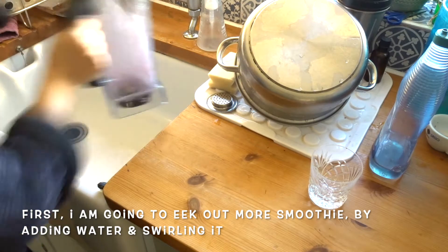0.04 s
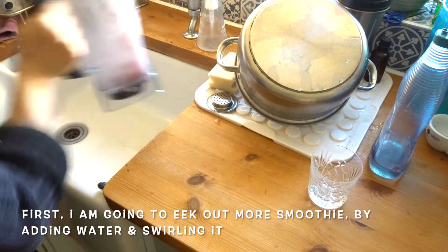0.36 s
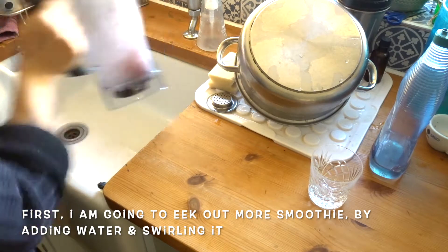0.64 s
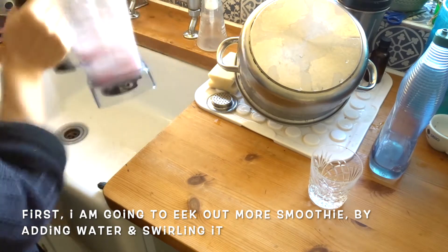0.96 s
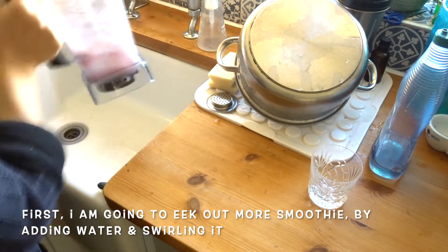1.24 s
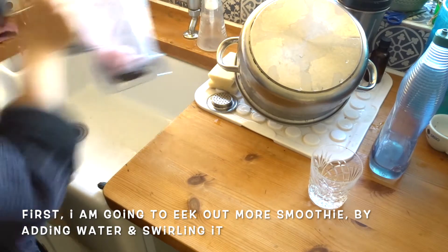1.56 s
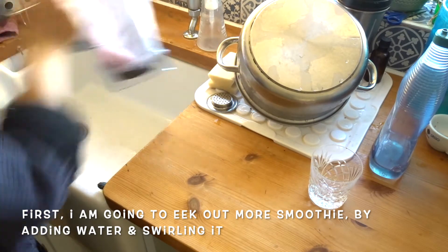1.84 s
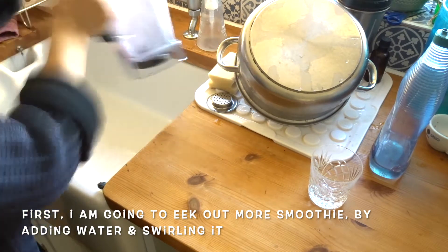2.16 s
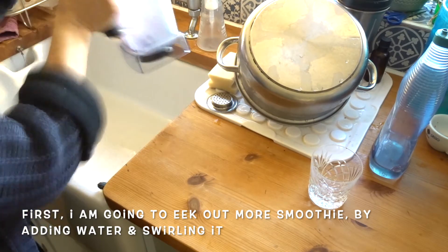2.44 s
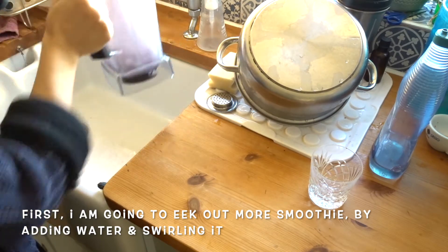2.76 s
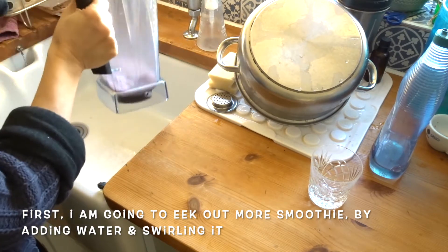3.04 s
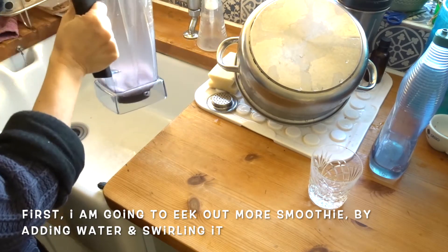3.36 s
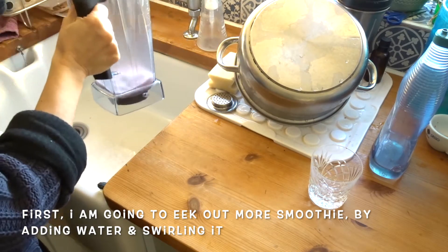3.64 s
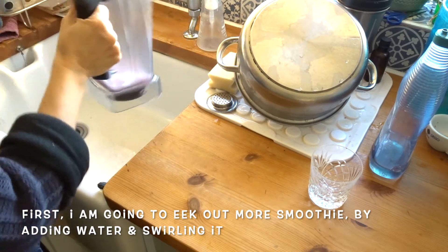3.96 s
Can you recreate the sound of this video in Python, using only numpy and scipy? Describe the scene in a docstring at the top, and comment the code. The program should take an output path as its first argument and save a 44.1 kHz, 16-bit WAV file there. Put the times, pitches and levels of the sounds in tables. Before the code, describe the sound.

Water sloshes around a plastic blender jug swirled by hand, nearly four splashes a second, each with hollow gurgles and a softer backwash. The swirling eases at about 2.7 seconds and settles by 3. From about 3.1 to 3.3 seconds the jug is set down in the sink with a clunk, rocking briefly. A faint appliance hum runs throughout in the kitchen and remains to the end.

```python
"""Water is swirled by hand in a plastic blender jug over a kitchen sink, nearly four turns a second.
Each turn throws a splash up the wall and a softer backwash; its bubbles ring the air in the jug.
The water calms and the jug is set down with a clunk, while an appliance hums in the room."""
import sys
import numpy as np
from scipy import signal
from scipy.fft import rfft, irfft
from scipy.io import wavfile

SR = 44100
rng = np.random.default_rng(int(sys.argv[2]) if len(sys.argv) > 2 else 0)


def master_out(mix):
    """Clip the mix to full scale and print it as 16-bit PCM to the path in sys.argv[1]."""
    frames = np.transpose(np.atleast_2d(mix))
    ceiling = np.clip(frames, -1, 1)
    pcm = np.round(ceiling * 32767).astype(np.int16)
    wavfile.write(sys.argv[1], SR, pcm)


N = 176400

# water thrown against the wall (start s, hold s, gurgle dB, spray dB)
SPLASHES = [(-.02, 0.029, 2, -0.5), (0.223, 0.029, 2, 5.5), (0.475, 0.083, 0.5, -0.5), (0.76, 0.054, 3, 0), (1.036, 0.094, -0.5, 0.5), (1.325, 0.061, -5.5, 0.5),
            (1.596, 0.074, -2, 0), (1.859, 0.085, -2, 1), (2.135, 0.074, -1, 2.5), (2.403, .095, -8, 1), (2.673, 0.028, -4.5, -3), (2.783, .025, -14, -9)]
RISE_S, FALL_S = 0.024, 0.025
# water running back round the jug (middle s, half length s, gurgle dB, spray dB)
BACKWASHES = [(0.101, 0.062, -6, -6), (0.341, 0.08, -4.5, -4), (0.663, 0.058, -6, -5), (0.904, 0.082, -6, -4.5), (1.227, 0.047, -5.5, -4), (1.477, 0.095, -8, -4),
              (1.753, 0.058, -4.5, -2), (2.046, 0.056, -3.5, -4), (2.299, 0.048, -2, -2), (2.583, 0.069, -7, -5.5), (2.766, 0.022, -11, -9.5), (2.882, 0.065, -21, -22)]
# bubble sounds (Hz, dB per Hz)
GURGLE = [(60, -42.5), (110, -21), (150, -14.5), (250, -22), (400, -14.5), (700, -8), (900, -6.5), (1080, -8), (1250, -1), (2200, 1.5), (2800, -13), (4000, -9), (8000, -46)]
SPRAY = [(300, -45), (1200, -4), (2300, 1), (3300, 1), (4800, 0), (6200, -5.5), (8000, -10), (10000, -13.5), (11200, -16)]
GURGLE_DB, GURGLE_PER_S, GURGLE_SPREAD_DB, GURGLE_CYCLES = -34, 1500, 3, 3
SPRAY_DB, SPRAY_PER_S, SPRAY_SPREAD_DB, SPRAY_CYCLES = -29.5, 6000, 0.5, 2.35
# air resonances of the jug (Hz, width Hz, gain dB)
JUG_AIR = [(558.7, 16, 16), (670, 88, 4.5), (1156, 39, 4), (1262, 25, 2), (1366, 40, -7), (1567, 70, 5), (1630, 40, -24), (2288, 94, -7), (2363, 46, -7), (3330, 33, -12.5), (4130, 65, -19)]
AIR_WANDER, TURNS_HZ = 0.029, 3.4
# large single bubbles (s, pitch Hz, peak dB, t60 s)
GULPS = [(.003, 1245, -30.5, 0.34), (0.111, 4570, -18.5, 0.014), (0.141, 4070, -19.5, 0.016), (.2105, 2550, -23, 0.027), (.211, 564, -32.5, 0.088), (.245, 1685, -20, 0.091), (.249, 2400, -16.5, 0.038), (0.486, 1380, -17.5, 0.034), (.506, 3840, -17.5, 0.055),
         (.777, 1408, -12.5, 0.035), (0.7848, 1755, -11.5, 0.018), (.791, 2406, -16.5, 0.087), (0.794, 1260, -16, 0.088), (0.983, 2357, -28, .07), (1.06, 1137, -21, 0.075), (1.138, 2310, -19.5, .08),
         (1.33, 1710, -25, 0.057), (1.353, 1740, -18.5, 0.047), (1.471, 2260, -23, 0.094), (1.877, 2390, -17, 0.034), (1.897, 4280, -9.5, 0.013), (1.935, 1537, -16, 0.05),
         (2.188, 2400, -21, .04), (2.296, 3890, -15, 0.018), (2.425, 1638, -16, 0.05), (2.507, 2260, -23, 0.055), (2.647, 1610, -26.5, 0.047), (2.693, 2250, -23.5, 0.071), (2.728, 2910, -24.5, 0.03), (2.75, 3870, -27.5, .03), (2.759, 2224, -27, 0.043),
         (2.771, 1283, -30, 0.16), (2.8, 2250, -33, 0.1), (2.821, 1304, -36, 0.15), (2.932, 6100, -40.5, 0.05)]
GULP_RISE_S, GULP_GLIDE = 0.00033, 0.014
# the jug's base meeting the sink (s, ring dB, crack dB, brightness Hz)
KNOCKS = [(3.11, -57, -43, 6000), (3.128, -32, -39.5, 1500), (3.1468, -24, -32, 3570), (3.2161, -12.5, -20, 4300), (3.272, -23.5, -49, 900), (3.292, -28, -34, 2460)]
# modes of the jug and sink (Hz, dB, t60 s)
BODY = [(474.5, -4.5, 0.1), (725, -5.5, 0.077), (769, -10.5, .09), (828, -8, 0.085), (913, -3.5, 0.073), (1290, -12.5, .1), (1350, -14, 0.066), (1863, -8.5, 0.064),
        (1918, -7, 0.056), (2600, -18, .03), (2590, -17, .03), (3330, -8, 0.031), (3800, -9, .03)]
CRACK_S, THUD_RISE_S, BODY_LOW_HZ = 0.0098, 0.0014, 213
ROOM_T60 = [(200, .42), (660, 0.44), (1740, 0.47), (4600, 0.22), (11000, 0.46)]  # (Hz, s)
WATER_ROOM_DB, KNOCK_ROOM_DB, NEAR_DB, NEAR_S = -8, -5.5, -6, 0.0048
WIDTH = [(100, -21), (500, -13), (1500, -12.5), (3000, -12), (4500, -5), (6000, -1.5), (8500, -1), (11000, 3)]  # (Hz, side over mid dB)
LEFT_DB = 0.57
HUM = [(59.6, -61.5), (419, -67), (538, -63), (597.5, -71), (657, -72.5), (775, -79), (893.6, -71)]  # (Hz, dB)
# room noise (Hz, dB per Hz)
FLOOR = [(20, -4), (60, -5.5), (100, -5), (160, -0.5), (250, -5), (400, 3), (600, -5), (880, -8), (1100, -16), (2500, -19), (6500, -20), (11000, -29.5)]
FLOOR_DB, FLOOR_SIDE_DB = -58.5, -9
EDGE_HZ = 11080  # fixed
T = np.arange(N) / SR
# water slapping the wall (s, level dB, length s, brightness Hz)
SLAPS = [(.28, -22, 0.018, 1000), (.528, -18, 0.0075, 1800), (1.4025, -16, 0.0057, 3400), (1.931, -23, 0.0038, 1600), (2.483, -22, 0.01, 4000)]
SLAP = [(450, -10.5), (800, -10), (1500, -2.5), (3000, 2), (6000, -5), (11000, -13)]  # (Hz, dB per Hz)
SLAP_LOWS = [(100, -25.5), (250, -12), (480, 2)]  # the wall radiates little bass (Hz, dB)
# the mass of water shifting in the jug (middle s, half length s, level dB)
HEAVES = [(0.574, 0.029, -54), (2.814, .03, -49)]
HEAVE = [(60, -39), (115, -10), (155, 12), (210, -14.5), (400, -25)]  # (Hz, dB per Hz)
CLUMP_DB, CLUMP_HZ = 1.6, 44.4
# dull blows of the jug's weight (s, pitch Hz, level dB, t60 s)
THUDS = [(3.144, 291, -24, 0.084), (3.156, 328, -35, 0.23), (3.218, 318, -32, .1)]
CRACK = [(80, -10), (300, 3), (900, -2), (2000, -0.5), (3800, -1), (5500, -8), (8000, -20.5), (11000, -28)]  # (Hz, dB per Hz)
FOAM = [(1500, -24), (3000, -8), (4500, -7), (6200, 3), (8000, -6), (11000, -16)]  # (Hz, dB per Hz)
FOAM_DB, FOAM_AT_S, FOAM_HALF_S = -69.5, 3.66, 0.17


def amp(db):
    """Decibels to gain."""
    return 10 ** (np.asarray(db) / 20)


def unit(x):
    """Scales to rms 1."""
    return x / np.sqrt(np.mean(x ** 2) + 1e-20)


def read(points, hz):
    """Reads a table on a log-frequency axis."""
    f, value = np.transpose(points)
    return np.interp(np.log(hz + 1), np.log(f + 1), value)


def colour(x, points):
    """Filters by a smooth (Hz, dB) curve."""
    size = 2 * x.shape[-1]
    return irfft(rfft(x, size) * amp(read(points, np.fft.rfftfreq(size, 1 / SR))))[..., :size // 2]


def add(mix, s, sound):
    """Adds a sound at a time."""
    part = mix[max(round(s * SR), 0):][:len(sound)]
    part += sound[:len(part)]


def resonate(x, hz, width):
    """A resonance of gain 1 that follows the curve hz."""
    turn, r = np.exp(2j * np.pi * np.cumsum(hz) / SR), np.exp(-np.pi * width / SR)
    return 2 * (turn * signal.lfilter([1 - r], [1, -r], x / turn)).real


def flow():
    """Strength of gurgle and spray: splashes rise, hold and fall; backwashes swell between them."""
    power = np.zeros((2, N))
    for start, hold, *db in SPLASHES:
        shape = np.clip((T - start) / RISE_S, 0, 1) * np.exp(-np.maximum(T - start - hold, 0) / FALL_S)
        power += (amp(db)[:, None] * shape) ** 2
    for middle, half, *db in BACKWASHES:
        power += amp(db)[:, None] ** 2 * np.exp(-((T - middle) / half) ** 2)
    return np.sqrt(power)


def bubbles(low_hz, high_hz, per_s, spread_db, cycles, glide, count=36):
    """A steady swarm of short rising rings of many pitches, a few much larger than the rest."""
    out = np.zeros(N)
    pitches = np.geomspace(low_hz, high_hz, count)
    for hz in pitches:
        births = rng.random(N) < per_s * hz / pitches.sum() / SR
        sizes = amp(spread_db * np.minimum(rng.exponential(1, N), 4.5)) * rng.choice([-1, 1], N)
        age = T[:int(7 * cycles / hz * SR)] * hz / cycles
        ring = (1 - np.exp(-4 * age)) * np.exp(-age) * np.sin(2 * np.pi * cycles * age * (1 + glide * age))
        out += np.sqrt(hz) * unit(signal.oaconvolve(births * sizes, ring)[:N])
    return out


def swirl():
    """Gurgle, spray and slaps ring the jug's air, whose pitches sway with the water."""
    gurgle, spray = flow()
    gurgle = gurgle * amp(GURGLE_DB) * unit(colour(bubbles(126.4, 3240, GURGLE_PER_S, GURGLE_SPREAD_DB, GURGLE_CYCLES, glide=0.012), GURGLE))
    spray = spray * amp(SPRAY_DB) * unit(colour(bubbles(2050, 10370, SPRAY_PER_S, SPRAY_SPREAD_DB, SPRAY_CYCLES, glide=0.022), SPRAY))
    water = gurgle * clumps() + spray * clumps()
    for s, db, length_s, bright_hz in SLAPS:
        add(water, s, amp(db) * dull(colour(burst(SLAP, length_s), SLAP_LOWS), bright_hz))
    air = sum(amp(db) * resonate(water, hz * (1 + AIR_WANDER * np.sin(2 * np.pi * (TURNS_HZ * T + rng.random()))), width) for hz, width, db in JUG_AIR)
    return water + air


def gulps():
    """Large pockets of trapped air ring once each, rising slightly in pitch."""
    out, t = np.zeros(N), T[:SR // 4]
    for s, hz, db, t60 in GULPS:
        turns = np.cumsum(hz * (1 + GULP_GLIDE * np.minimum(t / t60, 1))) / SR
        add(out, s, amp(db - 60 * t / t60) * (1 - np.exp(-t / GULP_RISE_S)) * np.sin(2 * np.pi * turns))
    return out


def set_down():
    """The base touches, lands and rocks: each contact cracks and rings the same modes; the weight thuds."""
    out, t = np.zeros(N), T[:SR // 2]
    for s, ring_db, crack_db, bright_hz in KNOCKS:
        ring = sum(rng.choice([-1, 1]) * amp(level - 60 * t / t60) * np.sin(2 * np.pi * hz * t) for hz, level, t60 in BODY)
        add(out, s, dull(.5 * amp(ring_db) * ring + amp(crack_db) * burst(CRACK, CRACK_S), bright_hz))
    for s, hz, db, t60 in THUDS:
        add(out, s, amp(db - 60 * t / t60) * np.minimum(t / THUD_RISE_S, 1) * np.sin(2 * np.pi * hz * t))
    return signal.lfilter(*signal.butter(2, BODY_LOW_HZ, "high", fs=SR), out)


def echoes(room_db):
    """Mid and side responses for one place of the jug: quick reflections from the sink, then the room's tail."""
    t = T[:SR // 2]
    taps = rng.standard_normal((4, len(t))) * (rng.random((4, len(t))) < 4000 / SR)
    near = taps[:2] * np.exp(-t / NEAR_S) * (t > .0005)
    hz, age, z = signal.stft(taps[2:] * np.minimum(t / .012, 1), SR, nperseg=256)
    tail = signal.istft(z * amp(-60 * age / read(ROOM_T60, hz)[:, None]), SR, nperseg=256)[1][:, :len(t)]
    near, tail = (v / np.linalg.norm(v, axis=1, keepdims=True) for v in (near, tail))
    mid = amp(NEAR_DB) * near[0] + amp(room_db) * tail[0]
    side = near[1] + amp(room_db + 3) * tail[1]
    return np.array([mid, side / np.linalg.norm(side)])


def kitchen(x, room_db, turns, count=6):
    """Direct sound plus echoes that change as the jug goes round; the treble spreads wide."""
    away = [abs((turns + k / count) % 1 - .5) * count for k in range(count)]
    shares = [np.cos(np.pi / 2 * np.minimum(a, 1)) for a in away]
    wet, side = sum(signal.fftconvolve((x * share)[None], echoes(room_db), axes=1)[:, :N] for share in shares)
    mid = (x + wet) / np.sqrt(1 + amp(NEAR_DB) ** 2 + amp(room_db) ** 2)
    side = colour(side, WIDTH)
    return np.array([mid + side, mid - side]) * amp([[LEFT_DB], [-LEFT_DB]])


def background():
    """An appliance's hum and soft room noise."""
    hum = sum(amp(db) * unit(np.sin(2 * np.pi * (hz * T + rng.random()))) for hz, db in HUM)
    mid, side = amp(FLOOR_DB) * unit(colour(rng.standard_normal((2, N)), FLOOR))
    side = amp(FLOOR_SIDE_DB) * colour(side, [(500, -2), (1500, 12.5), (6000, 8)])
    return hum + np.array([mid + side, mid - side])


def burst(spectrum, length_s):
    """A short dying puff of coloured noise."""
    t = T[:SR // 2]
    return unit(colour(rng.standard_normal(len(t)), spectrum)) * np.exp(-t / length_s)


def dull(x, hz):
    """A gentle low-pass."""
    return signal.lfilter(*signal.butter(1, min(hz, SR / 3), fs=SR), x)


def clumps():
    """A quick random swelling: bubbles are born in clusters."""
    wobble = signal.lfilter(*signal.butter(2, CLUMP_HZ, fs=SR), rng.standard_normal(N))
    return unit(amp(CLUMP_DB * unit(wobble)))


def heaves():
    """A soft low rumble when the whole mass of water shifts."""
    level = sum(amp(db) * np.exp(-((T - middle) / half) ** 2) for middle, half, db in HEAVES)
    return level * unit(colour(rng.standard_normal(N), HEAVE))


def foam():
    """A faint hiss swells and fades as the foam settles."""
    return amp(FOAM_DB) * np.exp(-((T - FOAM_AT_S) / FOAM_HALF_S) ** 2) * unit(colour(rng.standard_normal(N), FOAM))


def scene():
    """Water in the circling jug, then the jug at rest, in the kitchen."""
    water = kitchen(swirl() + gulps() + heaves() + foam(), WATER_ROOM_DB, TURNS_HZ * T)
    return water + kitchen(set_down(), KNOCK_ROOM_DB, 0) + background()


def record(dry):
    """The recorder's band limit."""
    return signal.oaconvolve(dry, signal.firwin(511, EDGE_HZ, window=("kaiser", 9), fs=SR)[None], "same")  # fixed


dry = scene()
out = record(dry)
master_out(out)
```